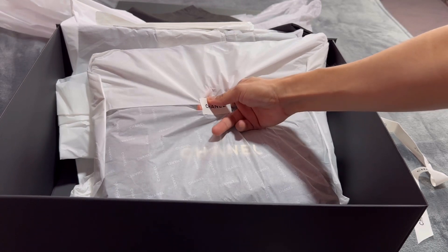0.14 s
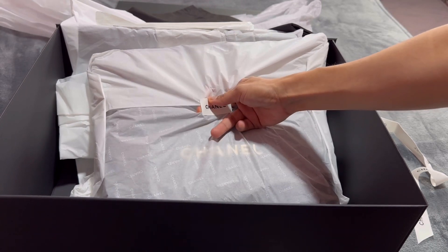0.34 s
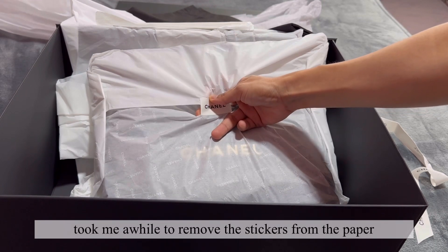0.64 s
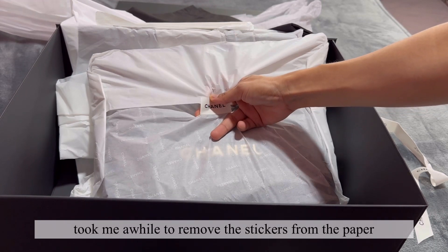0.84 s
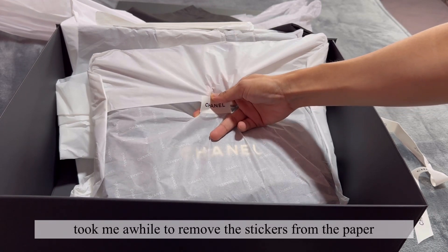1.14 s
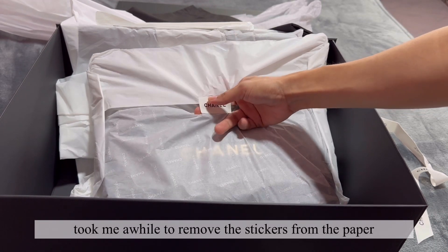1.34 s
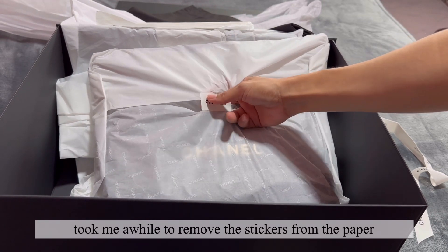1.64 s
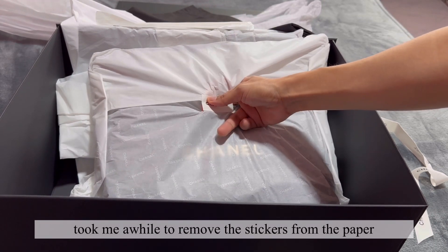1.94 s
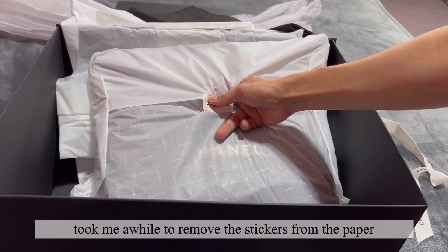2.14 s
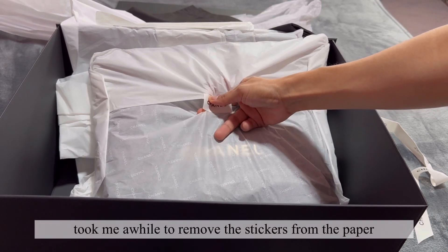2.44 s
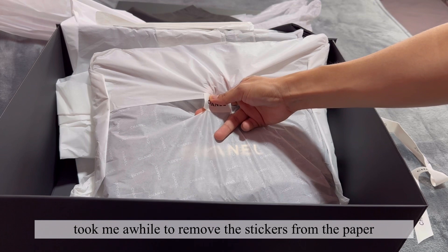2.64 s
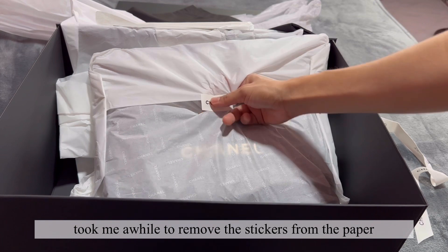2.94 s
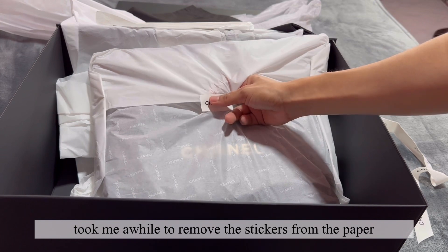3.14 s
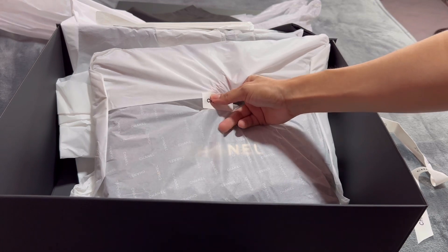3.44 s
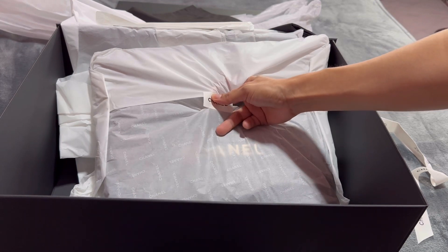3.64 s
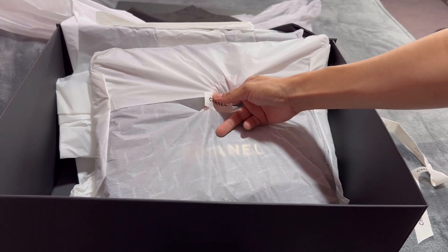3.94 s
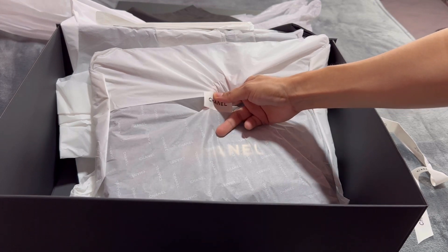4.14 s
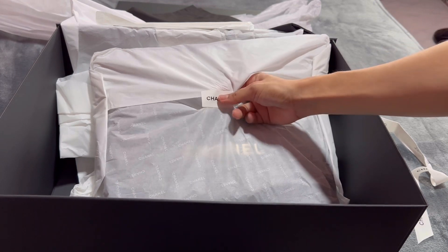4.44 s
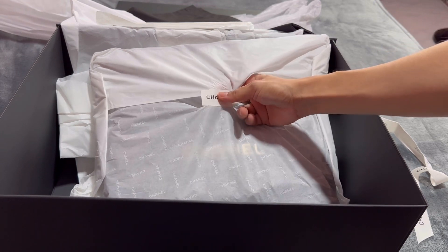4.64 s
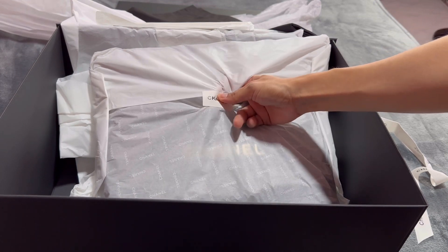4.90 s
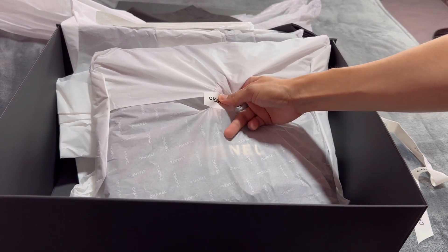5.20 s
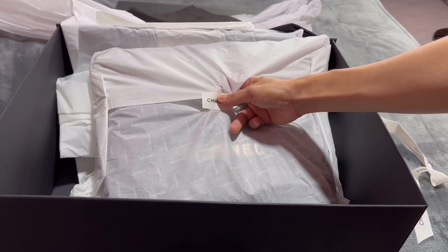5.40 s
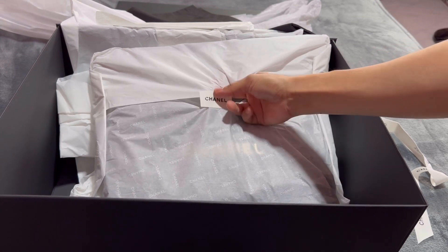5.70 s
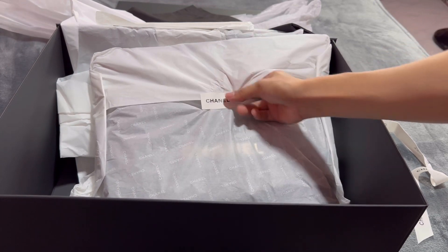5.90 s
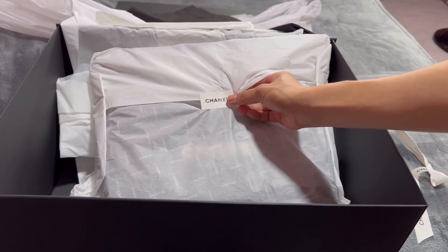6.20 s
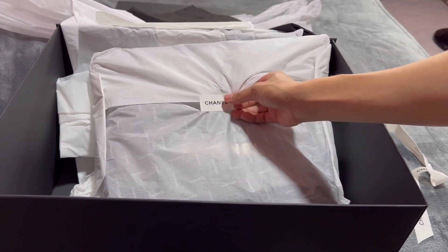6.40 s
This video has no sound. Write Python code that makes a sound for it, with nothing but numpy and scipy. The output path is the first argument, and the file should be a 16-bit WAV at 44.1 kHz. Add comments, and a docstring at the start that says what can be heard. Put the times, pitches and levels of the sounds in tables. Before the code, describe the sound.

Fingers pick at a sticker on thin tissue paper in a cardboard box, heard very close in stereo in a small, soft room. From 0 s the sheet crackles in small bright pulls with dry ticks, easing to sparse, faint rustling around 0.6-1.0 s. Then dull low thuds begin, and stronger rubbing swells at 1.3-1.7 s with a faint box knock near 1.5 and the heaviest double bump at 1.7. Lighter creases and snaps follow from 2 to 3.3 s, with a brisk pull at 2.8. More thuds arrive around 3.6-4.2 s with low shaking and hollow knocks, then crisp pulls at 4.2-4.6. The loudest, sharp snap cracks at 5.1 s with a box knock, followed immediately by a smaller one. Softer bumps continue to 5.8 s; crinkling carries on to 6.5 s, with a bright snap near 6.4, over very quiet room air.

```python
"""Fingers pick at a sticker on thin tissue paper in a cardboard box, with a phone close by.
From the start the sheet rustles in pulls: noise of tiny fibre clicks, with small creases and big snaps.
After a second dull thuds join in, short falling notes, heaviest near 1.7 s; from 1.5 s knocks ring the box.
The loudest snap comes at 5.1 s, and the picking goes on to the end. Low shaking and quiet room tone lie
beneath; a short, soft room answers the paper, and the two microphone ports differ in timing and level."""
import sys
import numpy as np
from scipy import signal
from scipy.fft import rfft, irfft, next_fast_len
from scipy.io import wavfile
from scipy.ndimage import uniform_filter1d, map_coordinates

SR = 44100
rng = np.random.default_rng(int(sys.argv[2]) if len(sys.argv) > 2 else 0)


def store_pcm(level_fs):
    """Save levels as 16-bit WAV."""
    pcm = np.round(np.clip(level_fs, -1, 1) * 32767).astype(np.int16)
    wavfile.write(sys.argv[1], SR, np.atleast_2d(pcm).T)


def invert_db(level):
    """Linear amplitude ratio for a level in decibels (20 dB per decade), elementwise."""
    return 10 ** (np.asarray(level, dtype=float) / 20)


N = 289296  # length in samples


def unit(x):
    """Scaled to rms 1."""
    return x / np.sqrt(np.mean(x ** 2) + 1e-20)


def along(points, hz):
    """Reads (frequency [Hz], value) points on a log frequency axis."""
    point_hz, value = np.transpose(points)
    return np.interp(np.log(hz + 1), np.log(point_hz + 1), value)


def wobble(rate):
    """A smooth random curve with rate knots a second."""
    knots = rng.standard_normal(int(N * rate / SR) + 4)
    return map_coordinates(knots, [np.arange(N) * rate / SR])


def filtered(x, response):
    """Multiplies the spectrum of x by a complex response of frequency."""
    m = next_fast_len(N + SR // 2)
    return irfft(rfft(x, m) * response(np.fft.rfftfreq(m, 1 / SR)), m)[..., :N]


def coloured(x, spectrum):
    """Filters x through a spectrum scaled to keep the power of white noise."""
    gain = invert_db(along(spectrum, np.linspace(0, SR / 2, num=999)))
    norm = np.sqrt(np.mean(gain ** 2))
    return filtered(x, lambda hz: invert_db(along(spectrum, hz)) / norm)


def bursts(s, db, ms):
    """Envelope of bursts peaking at s, about ms wide: a swell and a slightly longer dying."""
    open_s = 0.0016  # even a long burst starts within about this time
    reach = int(np.max(ms) * SR / 1000) + 1
    step = np.arange(-2 * reach, 3 * reach)
    u = step / (ms[:, None] * SR / 1000)  # time in burst widths
    swell = np.exp(-(u / .75) ** 2 - (step / (open_s * SR)) ** 2)
    dying = np.exp(-np.abs(u) / .6)
    shape = np.where(u < 0, swell, dying)
    at = np.clip(np.round(np.asarray(s) * SR).astype(int)[:, None] + step, 0, N)
    return np.bincount(at.ravel(), (invert_db(db)[:, None] * shape).ravel(), N + 1)[:N]


def room_tone():
    """Quiet air of the room: coloured noise whose level wavers slowly."""
    # colour of the air: (frequency [Hz], relative level [dB])
    air_colour = [(25, -47), (50, -4), (110, -6.5), (190, -2.5), (430, -6), (600, -22), (800, -14.5),
                  (3000, -22), (10500, -80), (16000, -48)]
    waver_db = 3 * wobble(5.4)
    return invert_db(-61.5 + waver_db) * coloured(rng.standard_normal(N), air_colour)


def shaking():
    """Low shaking of box and hand: rumbling noise made lumpy by a random swell."""
    # strength of the shaking: (time [s], level [dB])
    shake = [(0.85, -62), (0.93, -52.5), (1.15, -55.5), (1.63, -51), (1.72, -42.5), (2.02, -63),
             (2.83, -51), (3.05, -57.5), (3.44, -57), (3.84, -37.5), (4.12, -52.5), (4.3, -66), (4.71, -70),
             (4.91, -47.5), (5.2, -58), (5.56, -43), (5.68, -52), (5.95, -55), (6.55, -91)]
    # colour of the rumble: (frequency [Hz], relative level [dB])
    rumble_colour = [(18, -29), (35, -6.5), (65, 1), (110, -11.5), (200, -18), (300, -44)]
    s, db = np.transpose(shake)
    rumble = unit(coloured(rng.standard_normal(N), rumble_colour))
    lumps = unit(invert_db(3.8 * wobble(18)) * rumble)
    return invert_db(np.interp(np.arange(N) / SR, s, db)) * lumps


def background():
    """Room tone and low shaking, new noise at every call."""
    return room_tone() + shaking()


def knocks():
    """A short push rings the walls of the box, each resonance a band-pass."""
    # knocks on the cardboard, before the delay and lift below: (time [s], level [dB])
    knock_rows = [(1.47, -40.5), (3.917, -40.5), (4.074, -35.5), (4.114, -39), (5.136, -27.5),
                  (5.19, -43.5)]
    # resonances of the walls: (frequency [Hz], width [Hz], level [dB])
    cardboard = [(218, 51, 10.5), (405, 29, -5), (840, 600, -10.5), (1260, 320, -8)]
    s, db = np.transpose(knock_rows)
    push = bursts(s + 0.00185, db + 18.5, np.full(len(s), .2))

    def walls(hz):
        return sum(invert_db(db) * 1j * hz * width / (centre ** 2 - hz ** 2 + 1j * hz * width)
                   for centre, width, db in cardboard)
    return filtered(push, walls)


def thuds():
    """Each blow sends its high part first, so the short note slides down as it passes."""
    # dull blows through box and hand: (time [s], envelope peak level [dB], mid-slide frequency [Hz])
    blows = [(1.008, -37.5, 112), (1.043, -40, 45.8), (1.316, -37.5, 83.4), (1.378, -38, 59),
             (1.645, -32, 75.5), (1.665, -32.5, 124), (1.702, -18.5, 68), (1.735, -19, 71.5),
             (1.87, -41, 63), (2.631, -34.5, 59.7), (2.826, -31.5, 78), (2.869, -39, 60.4),
             (3.318, -36.5, 55), (3.621, -23, 106), (3.647, -28.5, 80.5), (3.68, -38.5, 74),
             (3.763, -37, 65), (3.831, -33, 124), (3.847, -24, 65), (3.899, -33, 91), (4.015, -34.5, 67),
             (4.096, -29, 105), (4.157, -36.5, 95), (4.91, -37, 79.6), (5.141, -39, 129),
             (5.295, -34.5, 75), (5.347, -39, 80), (5.403, -32.5, 128), (5.494, -34, 78),
             (5.542, -30.5, 170), (5.563, -27.5, 64.3), (5.715, -32, 103), (5.787, -43, 68.6),
             (5.819, -34.5, 81)]
    width_cycles = 1.32  # width of a blow in cycles of its note
    out = np.zeros(N + SR)
    t = np.arange(-SR // 10, SR // 10) / SR
    for s, db, hz in blows:
        width = width_cycles / hz
        u = t / width
        swell = np.exp(-(u / np.where(u < 0, .55, .75)) ** 2)
        cycles = hz * (t - 0.44 * width * np.log(np.cosh(u)))  # falls from 1.44 to 0.56 times hz
        out[round(s * SR):][:len(t)] += invert_db(db) * swell * np.cos(2 * np.pi * (cycles + 0.4))
    return out[SR // 10:][:N]


def pulls():
    """Rustle level in dB: every pull swells and fades at a steady rate, the strongest is heard."""
    # pulls of the finger: (time of strongest pull [s], level [dB], swell [s], fade [s])
    pull_rows = [(0.0, -42, .05, 0.067), (.145, -44, 0.13, 0.1), (.27, -45, 0.11, 0.078),
                 (.47, -45.5, 0.23, 0.055), (.59, -52, 0.12, .05), (.7, -56.5, 0.012, 0.034),
                 (.788, -52, 0.012, 0.043), (.878, -57, 0.018, .2), (.968, -53.5, 0.069, 0.35),
                 (1.278, -40, 0.067, 0.15), (1.477, -37.5, 0.059, 0.12), (1.696, -43, 0.099, .15),
                 (1.936, -51, 0.51, 0.15), (2.155, -47, 0.043, 0.17), (2.34, -46.5, 0.071, 0.041),
                 (2.449, -52, 0.04, 0.048), (2.55, -51.5, 0.038, .1), (2.703, -50, .03, .03),
                 (2.804, -38, 0.026, .12), (2.92, -45, .15, .07), (3.048, -45.5, 0.038, .07),
                 (3.125, -48.5, 0.041, .025), (3.248, -49, .01, .2), (3.325, -40, .065, .16),
                 (3.437, -43.5, .07, 0.16), (3.56, -43, 0.067, 0.085), (3.796, -51, 0.2, 0.51),
                 (4.135, -39, 0.022, 0.18), (4.316, -37.5, 0.079, 0.041), (4.46, -45, 0.32, 0.099),
                 (4.622, -40.5, 0.057, 0.091), (4.78, -48, 0.033, 0.13), (4.93, -48, 0.58, 0.071),
                 (5.055, -40, 0.0099, 0.021), (5.135, -31.5, .004, 0.043), (5.288, -44, 0.062, 0.18),
                 (5.517, -44.5, 0.12, 0.028), (5.65, -44.5, 0.028, .15), (5.77, -42.5, 0.059, 0.33),
                 (5.927, -41.5, 0.36, 0.1), (6.136, -47, 0.67, .13), (6.39, -41, 0.18, 0.27)]
    swell_db = 12  # change of level over one swell or fade time
    t = np.arange(0, N, 32) / SR
    s, db, swell, fade = np.transpose(pull_rows)[:, :, None]
    away = np.where(t < s, (s - t) / np.maximum(swell, .005), (t - s) / fade)
    return np.interp(np.arange(N) / SR, t, np.max(db - swell_db * away, axis=0))


def fibres(spiky_db):
    """Noise of tiny fibre clicks, rms 1, whose sizes jump evenly within +-spiky_db."""
    jumps = np.repeat(rng.uniform(-1, 1, N // 8 + 1), 8)[:N]
    return unit(rng.standard_normal(N) * invert_db(spiky_db * jumps))


def hail():
    """Small random creases, each leaning crisp or dull: one rms-1 envelope for either register."""
    when, size, life, tone = rng.random((1900, 4)).T
    size_db = 18 * size ** 2  # many small creases, fewer large ones
    ms = .4 + 1.4 * life
    lean_db = 12 * (tone - .5)
    return [unit(bursts(when * N / SR, size_db + side * lean_db, ms)) for side in (1, -1)]


def clumps(s, db, ms):
    """Each snap with its neighbours: three weaker creases give way just before or after it."""
    shift, loss = rng.random((len(s), 2, 3)).transpose(1, 2, 0)
    near_s = s + 0.0307 * (shift - .2)
    near_db = db - 12.0 - 12 * loss
    near = bursts(near_s.ravel(), near_db.ravel(), np.full(shift.size, .9))
    return bursts(s, db, ms) + near


def paper():
    """Smooth rubbing, a hail of small creases and the big snaps shape fibre noise, crisp and dull."""
    # loudest creases and glue letting go, as envelopes:
    # (time [s], crisp peak level [dB], dull peak level [dB], burst width [ms])
    snaps = [(0.019, -28, -39, 1.1), (0.065, -32.5, -48, 2.8), (0.1159, -32, -58, 0.97),
             (0.1331, -34, -40, 1.5), (0.1522, -28.5, -38.5, 1.2), (0.1683, -33, -33.5, 1.2),
             (0.2833, -31, -47, 3), (0.393, -37, -56, 1.5), (0.4903, -32.5, -55, 3.5),
             (0.5347, -31, -34, 1.6), (0.547, -32, -56, 1.3), (0.691, -49, -45.5, 0.86),
             (0.7088, -53, -42, 2.1), (0.786, -39, -41.5, 1.7), (0.8564, -31.5, -40.5, 1.2),
             (0.968, -35.5, -42, 5.2), (1.0365, -38, -46, 1.5), (1.0949, -27, -42, 0.61),
             (1.13, -41, -39, 0.96), (1.3966, -29, -60, 2.2), (1.565, -40, -36, 4.4),
             (1.6953, -46.5, -33, 4), (1.814, -34.5, -63, 1.1), (1.9013, -39, -37, 1.4),
             (1.9414, -39, -34.5, 3.7), (2.1522, -36, -34.5, 2.2), (2.162, -32, -28, 2.6),
             (2.2374, -27.5, -46, 1.8), (2.3244, -37, -38.5, 2.7), (2.3756, -42, -56, 1.7),
             (2.418, -27, -39, 3.1), (2.5306, -33, -34.5, 1.5), (2.54, -32.5, -36, 3.5),
             (2.5681, -33.5, -32.5, 2.8), (2.648, -41, -55, 1), (2.684, -42, -55, 1),
             (2.798, -29, -39, 1.9), (2.8506, -29.5, -35, 1.7), (2.9074, -33, -38, 1.5),
             (2.958, -40, -54, 1.2), (2.9724, -38, -41, 2.7), (3.0364, -32, -34, 1.3),
             (3.1175, -28, -41, 1.7), (3.199, -40, -55, 1), (3.245, -28.5, -38.5, 0.83),
             (3.2485, -35, -53, 1.1), (3.4284, -34, -50, 0.8), (3.4338, -30, -36, 2.2),
             (3.443, -35.5, -38, 1), (3.6484, -43, -46, 1.9), (3.715, -37.5, -54, 1.3),
             (3.765, -48, -34.5, 1.1), (3.9457, -36.5, -57, 0.85), (4.055, -49, -38, 1.4),
             (4.1847, -27, -31, 1.6), (4.311, -33, -43, 2.4), (4.393, -25.5, -36.5, 7.1),
             (4.4439, -28, -43, 2.3), (4.611, -56, -37, 0.98), (4.684, -39, -40, 2.3),
             (4.862, -27.5, -31, 0.98), (4.94, -37, -40, 1.8), (4.9621, -27.5, -44, 1.3),
             (4.9859, -30, -37.5, 1.4), (5.0338, -37, -41, 1.7), (5.0567, -47, -46, 2.1),
             (5.134, -19, -18.5, 7.7), (5.191, -22.5, -23, 1.2), (5.195, -31, -31, 1.2),
             (5.2568, -44, -35.5, 2.8), (5.288, -38.5, -37, 3.7), (5.331, -38, -44, 1.4),
             (5.365, -39, -50, 1), (5.382, -42, -44, 1.3), (5.4562, -49, -40, 1.2), (5.623, -40, -38, 3.5),
             (5.7633, -39, -47, 2.1), (5.9377, -32, -46, 1.5), (5.9464, -32, -47, 1.5),
             (6.05, -36, -44, 1.1), (6.096, -36, -49, 1.4), (6.13, -30, -42, 0.96),
             (6.2558, -31.5, -36.5, 7.5), (6.289, -34, -47, 3.1), (6.333, -33, -49, 1.8),
             (6.3538, -36, -40, 2.1), (6.398, -23.5, -38, 2.6), (6.445, -30.5, -59, 0.82)]
    # colour of the crisp register: (frequency [Hz], relative level [dB])
    crisp_colour = [(5000, -17), (7500, -6), (9000, -3.5), (10500, -1), (12500, -7), (14500, -8),
                    (16000, -7)]
    # colour of the dull register: (frequency [Hz], relative level [dB])
    dull_colour = [(150, -4.5), (300, -4.5), (570, -12.5), (1000, -7), (1750, -2.5), (2500, -4), (3500, -2),
                   (5500, -4.5), (7500, -4), (9500, -8.5)]
    # colour of the dull part of a snap: (frequency [Hz], relative level [dB])
    crack_colour = [(500, -15.5), (1300, -10.5), (2000, -10), (3300, 1), (4800, -3.5), (7500, -11.5),
                    (9500, -8)]

    crisp_db = pulls()
    over_db = crisp_db + 48  # strength of the pull against a middling one
    dull_db = -52 + 0.96 * over_db  # the dull register swings less than the crisp one
    surge = invert_db(1.2 * wobble(40))  # the finger slips and grips
    sparse = invert_db(-.45 * over_db)  # a weak pull is ticks, a strong one mostly rubbing
    crisp_hail, dull_hail = hail()

    s, crisp_peak_db, dull_peak_db, snap_ms = np.transpose(snaps)
    crisp_rub = invert_db(crisp_db - 1) * surge * (.55 + .72 * sparse * crisp_hail)
    crisp = crisp_rub + clumps(s, crisp_peak_db, snap_ms)
    dull = invert_db(dull_db) * surge * (1.09 + 0.63 * sparse * dull_hail)
    crack = clumps(s, dull_peak_db, snap_ms)

    def play():
        return (coloured(crisp * fibres(spiky_db=7.5), crisp_colour)
                + coloured(dull * fibres(spiky_db=2.5), dull_colour)
                + coloured(crack * fibres(spiky_db=4.5), crack_colour))
    return play(), play()  # same movements, separate fibre noise


def tinted(x, patchy_db):
    """Every crease has its own colour: random gain patches a few ms long and a few kHz wide."""
    z = signal.stft(x, nperseg=128)[2]
    field = rng.standard_normal(z.shape[-2:])
    field = uniform_filter1d(field, size=7, axis=0)
    field = uniform_filter1d(field, size=4, axis=1)
    gain = invert_db(patchy_db * unit(field))
    return signal.istft(z * unit(gain), nperseg=128)[1][..., :N]


def room(x):
    """Short, soft room: each frequency dies at its own speed in a regularly redrawn random tail."""
    # time to die by 60 dB: (frequency [Hz], decay time [s])
    decay = [(300, 0.22), (2000, 0.12), (6000, 0.16), (14000, 0.05)]
    out, hop = np.zeros(N + SR), 2048  # the tail is redrawn every hop of samples
    noise = rng.standard_normal((N // hop + 1, SR // 4))
    hz, t, z = signal.stft(noise, SR, nperseg=256)
    fade = invert_db(-60 * t / along(decay, hz)[:, None])
    tails = signal.istft(z * fade, SR, nperseg=256)[1]
    for k, tail in enumerate(tails):
        wet = signal.fftconvolve(x[k * hop:][:hop], tail / np.linalg.norm(tail))
        out[k * hop + 90:][:len(wet)] += wet  # answers 90 samples (2 ms) later
    return out[:N]


def ports(x, stray):
    """Two microphone ports: shared x and a stray sound opposed between them, then lag and shading."""
    # likeness of the ports for equally strong x and stray: (frequency [Hz], correlation [0-1])
    alike = [(100, .93), (500, .75), (4000, .62), (5500, .08), (7800, .68), (9500, .74), (11000, .95),
             (13500, .94), (14700, .6), (16500, .5)]
    # shading: (frequency [Hz], left minus right level [dB])
    tilt = [(60, 0), (160, 1), (450, .5), (1200, 4.5), (2000, .8), (4500, 2.5), (9000, .8), (15000, 0)]
    # lag: (frequency [Hz], phase by which left leads [rad])
    lead = [(100, -.6), (450, 0), (850, .8), (1500, -.7), (3400, 1.7), (5200, .5), (7900, 2.7), (11000, .1),
            (13600, -.2), (15500, -2.6)]

    def share(hz):
        turn = np.arccos(np.clip(along(alike, hz), 0, 1)) / 2
        return np.array([np.cos(turn), np.sin(turn)])

    def lag_and_shade(hz):
        half = invert_db(along(tilt, hz) / 2) * np.exp(.5j * along(lead, hz))
        return np.array([half, 1 / half])
    mid, side = filtered(np.array([x, stray]), share)
    return filtered(np.array([mid + side, mid - side]), lag_and_shade)


def scene():
    """Paper and blows near the phone, the room around them."""
    sheets = tinted(np.array(paper()), patchy_db=2.5)
    sheet, stray = [x + invert_db(-9.0) * room(x) for x in sheets]
    shared = sheet + thuds() + knocks() + background()
    return ports(shared, stray + background())


def low_pass(x):
    """Removes everything above the highest recorded frequency."""
    return signal.sosfilt(signal.butter(12, 16810, fs=SR, output="sos"), x)


def record(dry):
    """The phone keeps nothing above its band limit."""
    top_hz = 15900
    mix = filtered(dry, lambda hz: hz < top_hz)
    return low_pass(mix)


dry = scene()
out = record(dry)
store_pcm(out)
```